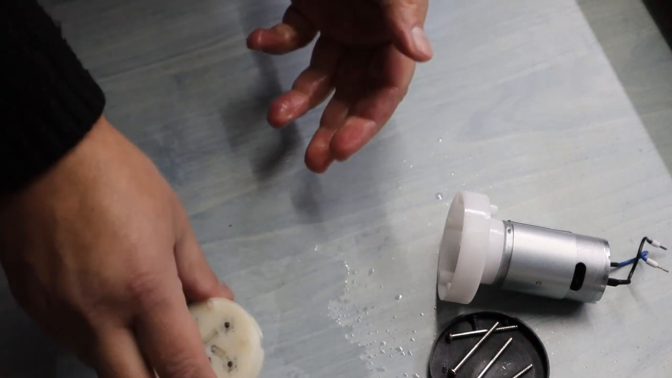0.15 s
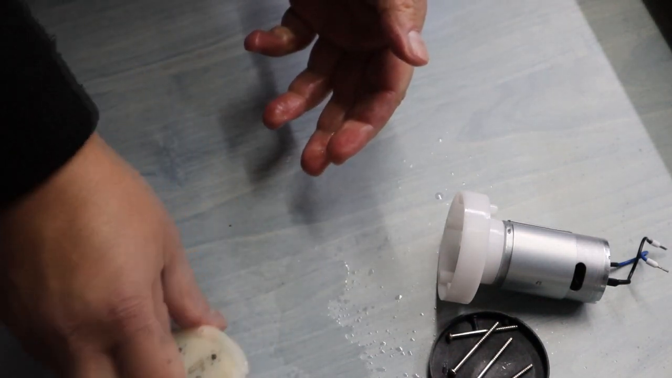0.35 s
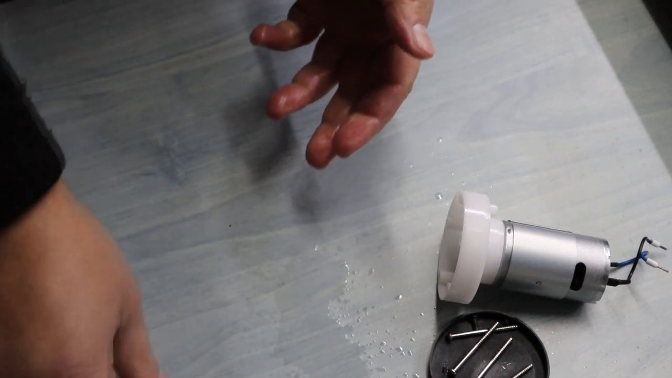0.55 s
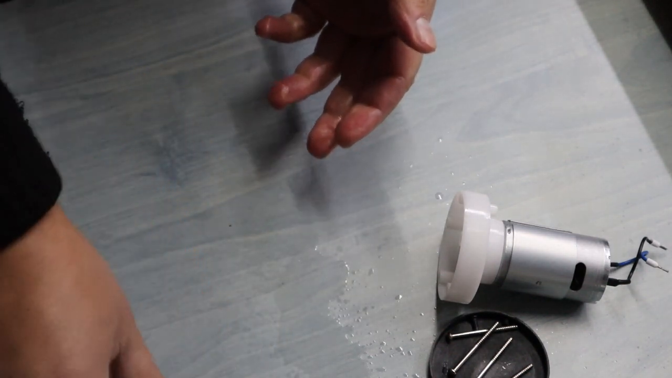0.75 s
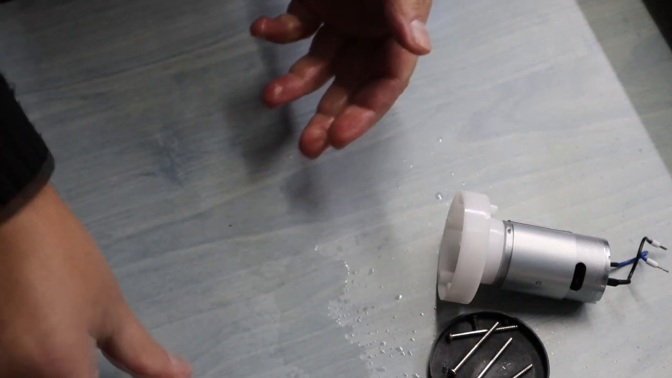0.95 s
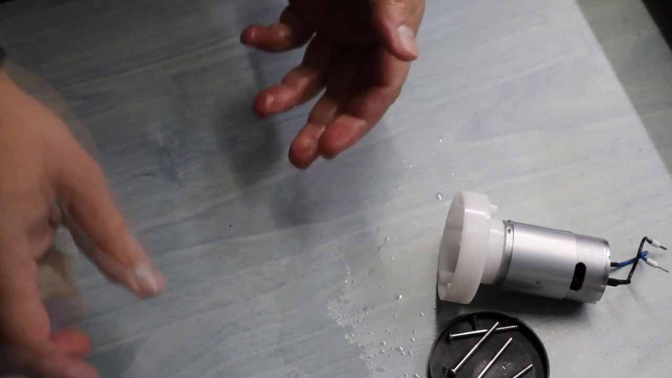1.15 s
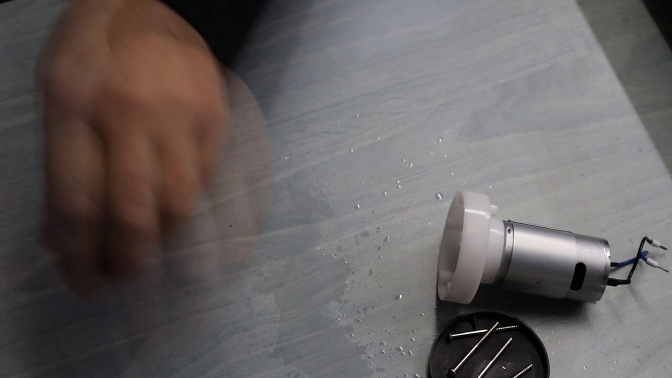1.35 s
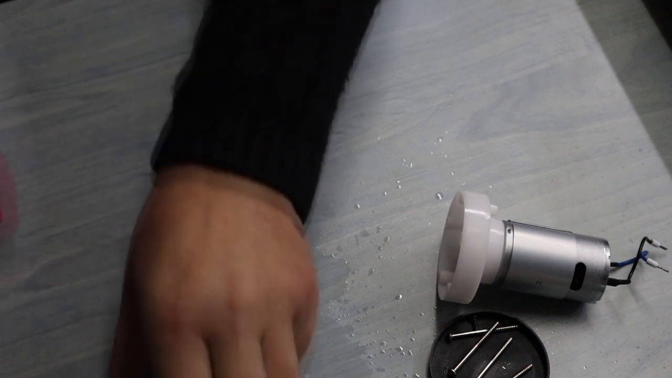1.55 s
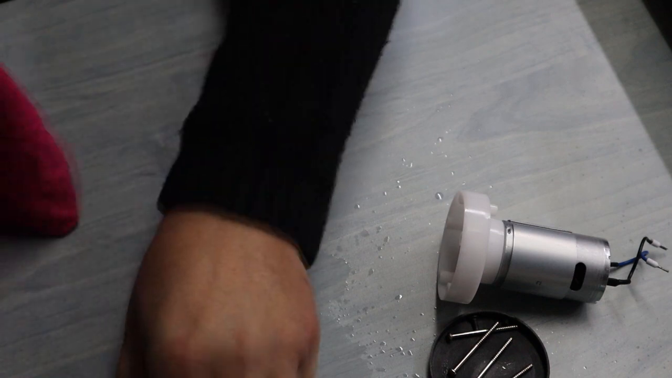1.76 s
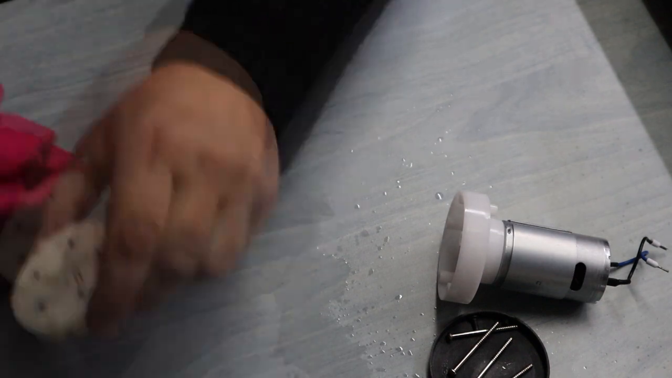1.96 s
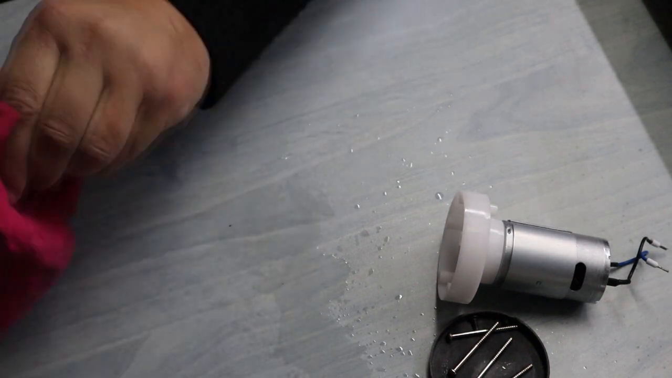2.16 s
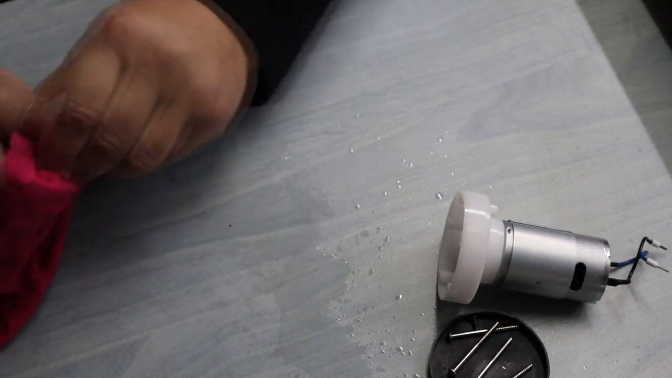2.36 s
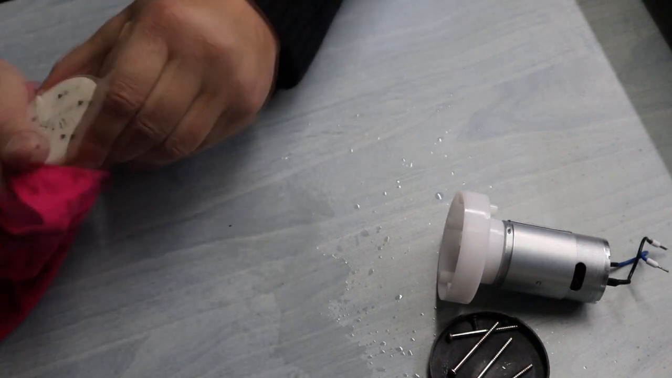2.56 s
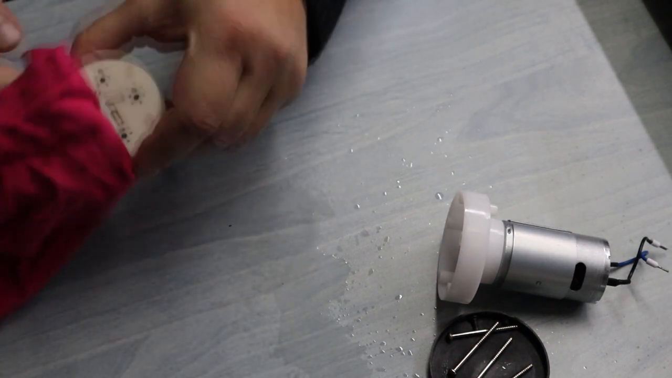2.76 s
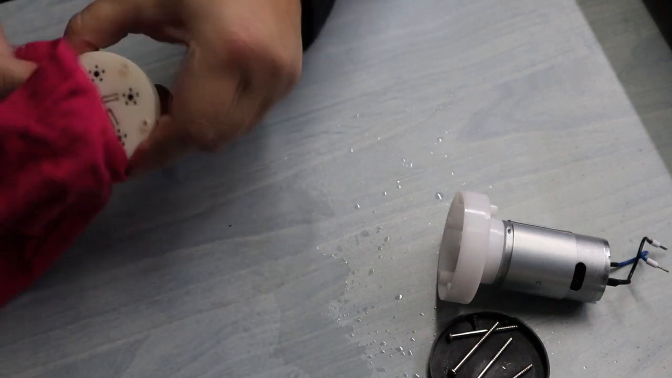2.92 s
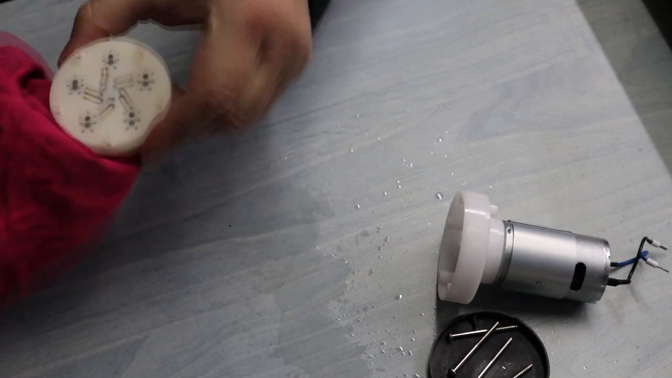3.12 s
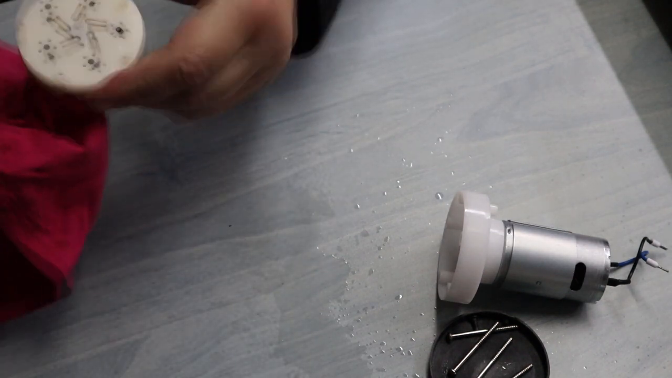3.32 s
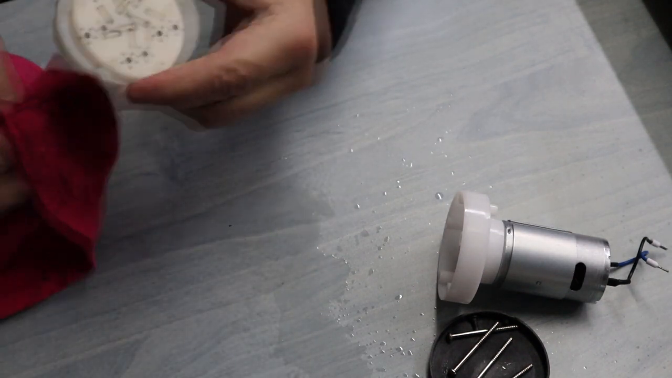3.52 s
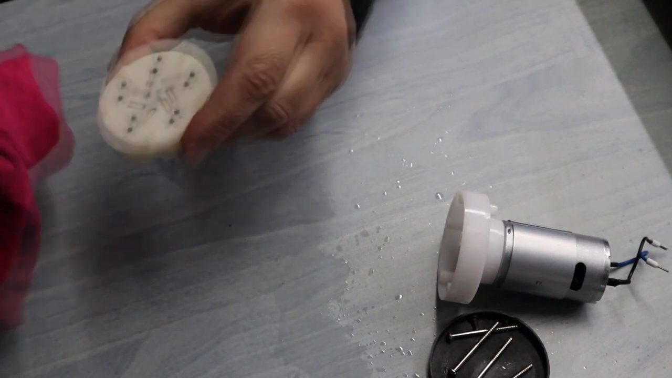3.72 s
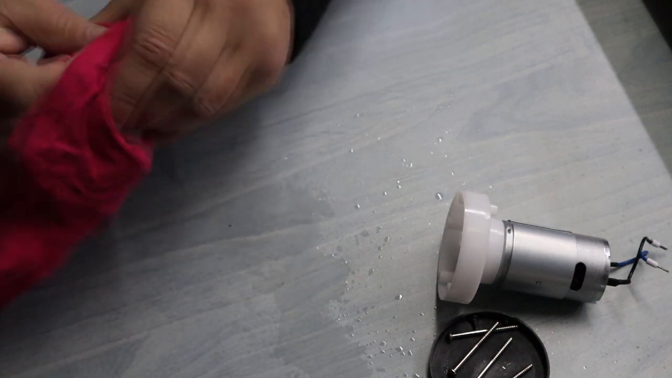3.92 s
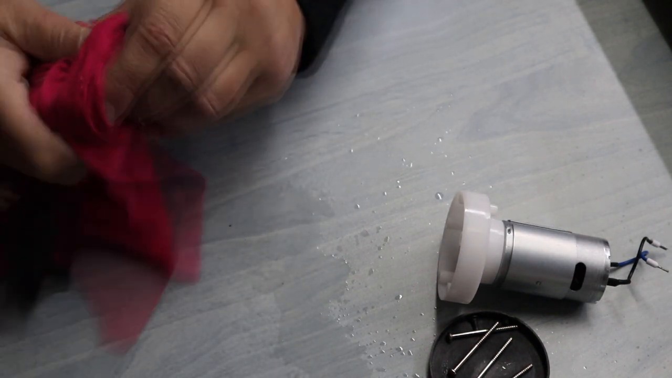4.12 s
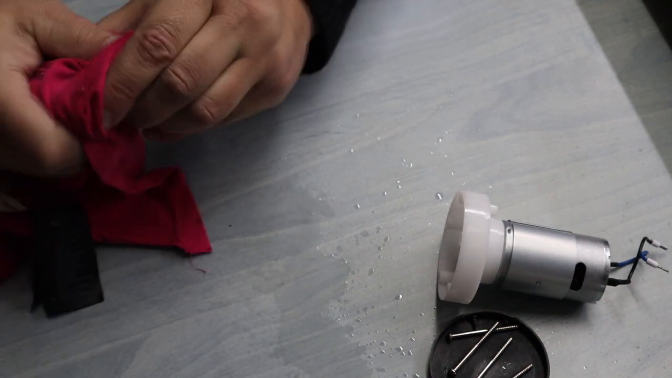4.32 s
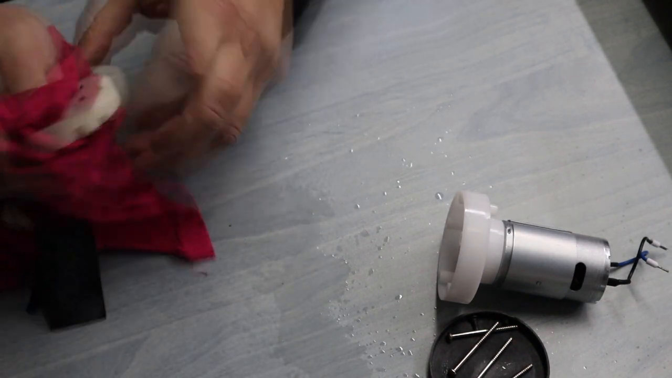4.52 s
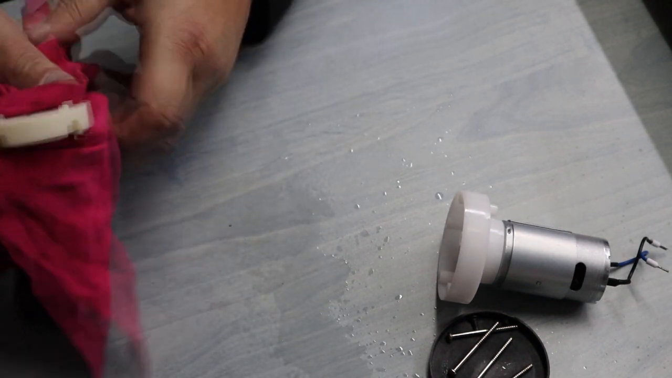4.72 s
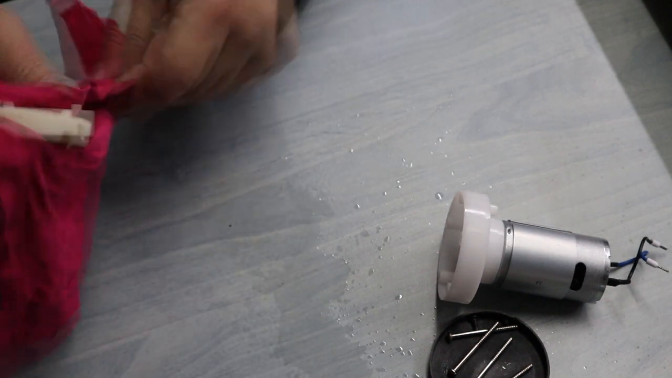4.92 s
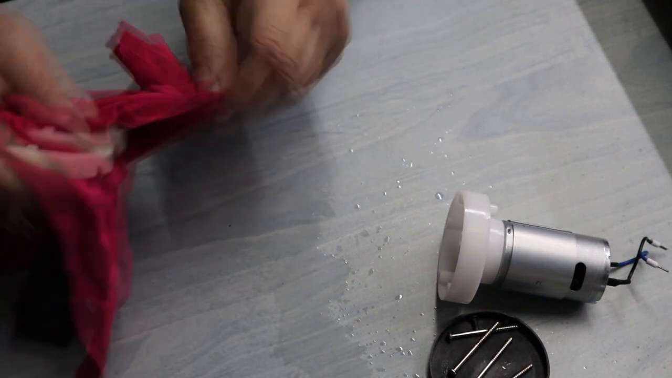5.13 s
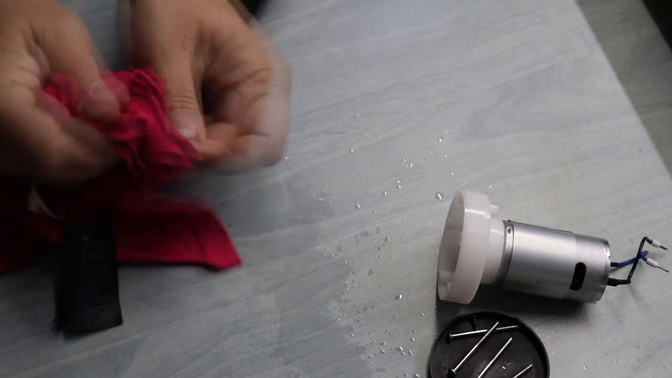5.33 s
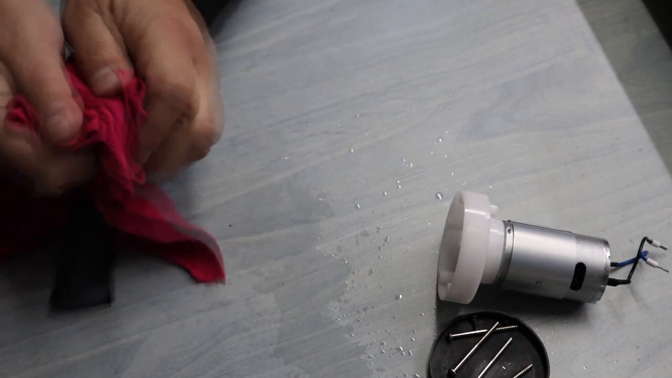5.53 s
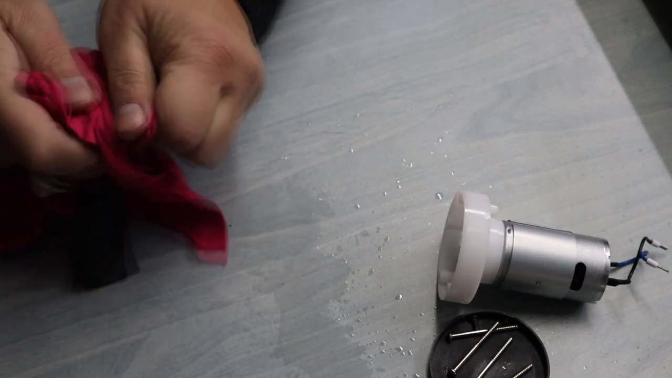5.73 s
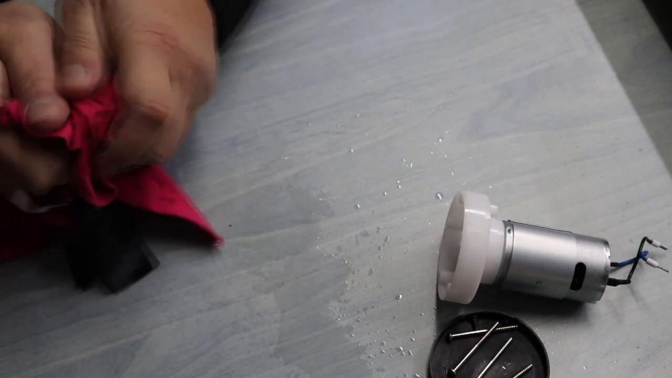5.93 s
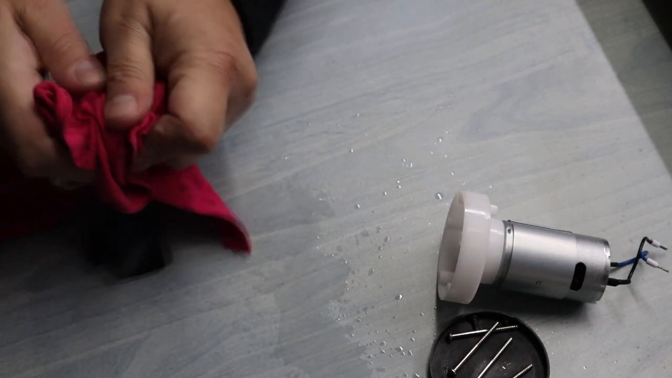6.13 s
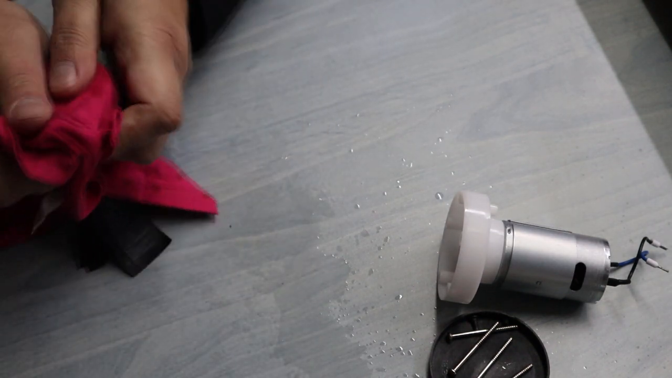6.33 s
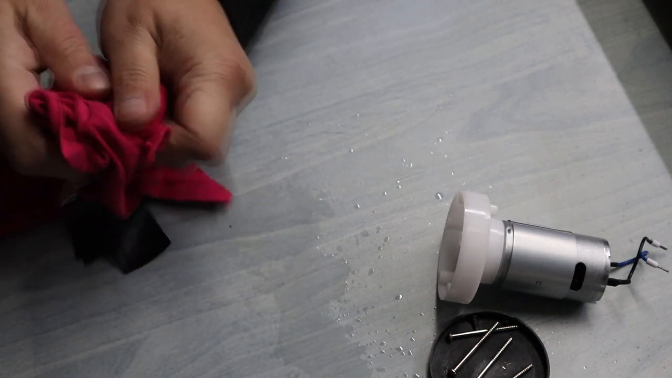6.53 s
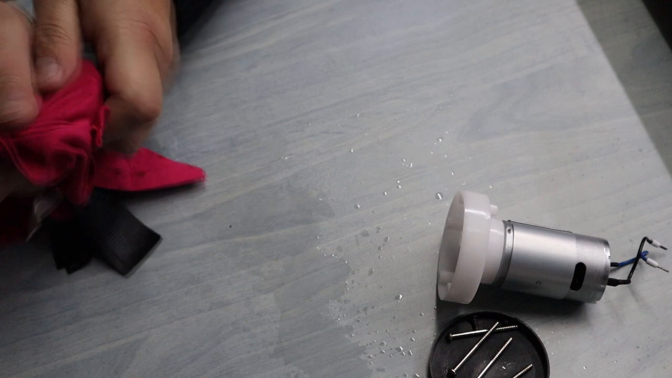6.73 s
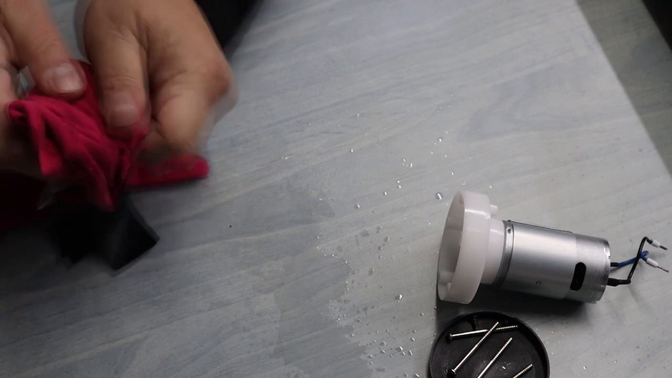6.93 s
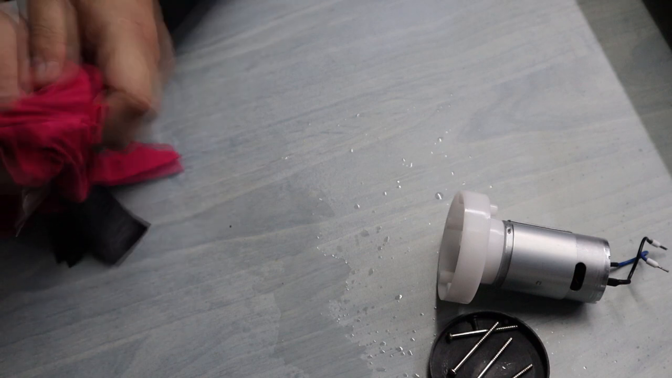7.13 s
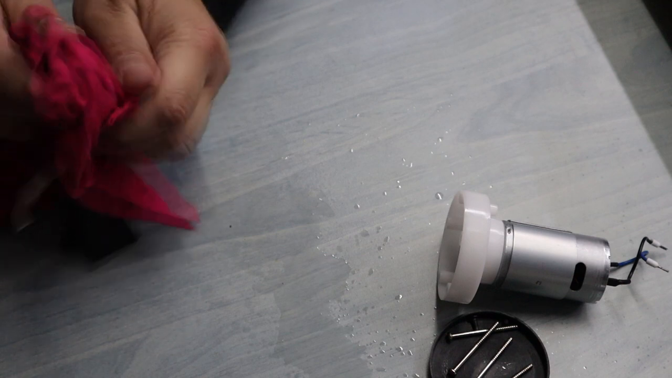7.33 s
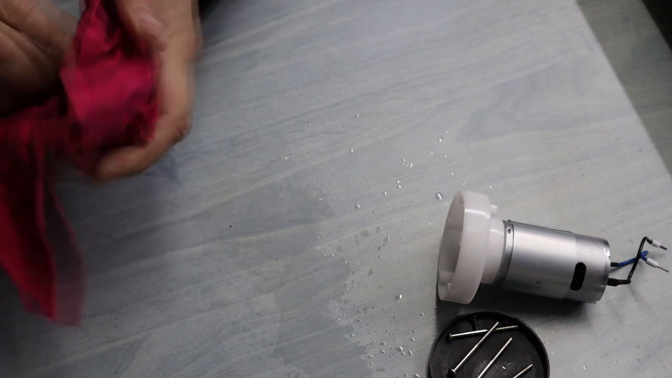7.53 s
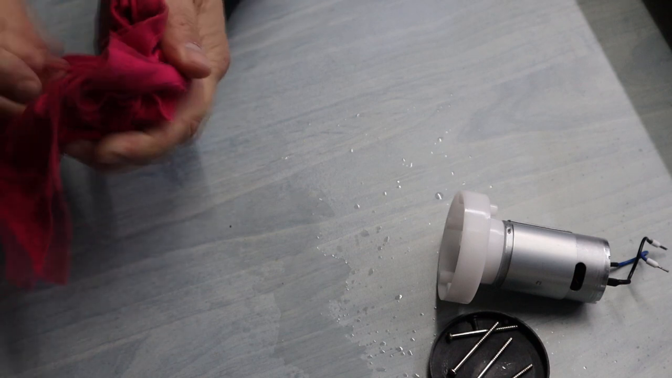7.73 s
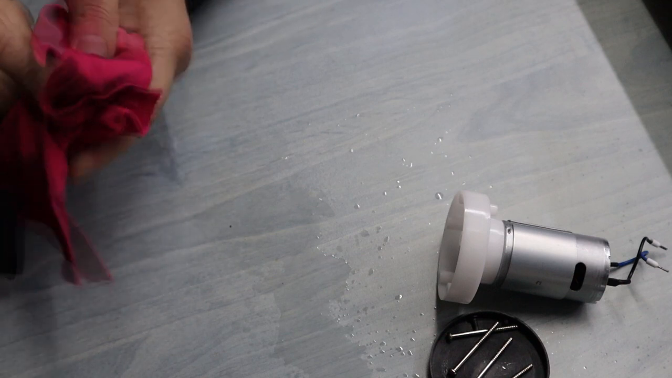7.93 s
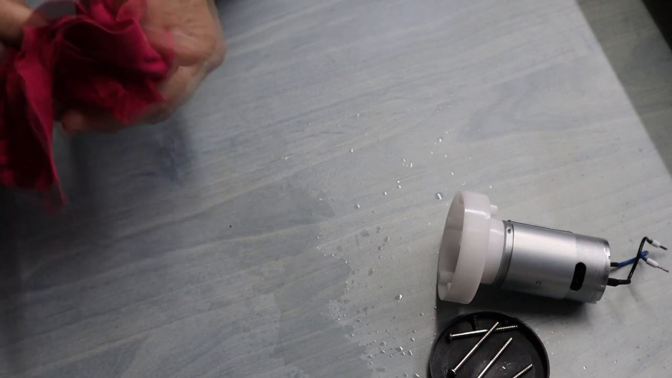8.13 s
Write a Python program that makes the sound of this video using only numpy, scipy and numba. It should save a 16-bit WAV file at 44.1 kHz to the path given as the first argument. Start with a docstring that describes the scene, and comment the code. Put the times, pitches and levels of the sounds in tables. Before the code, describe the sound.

A plastic disc knocks and slides on a tabletop, is scraped up by hand, then rubbed with a cloth in soft uneven strokes and small clicks.

```python
"""Plastic disc on a table, then wiped with a cloth

A plastic pump disc is knocked and slid on a table, scraped up by hand and then wiped dry with a cloth, indoors.
Knocks, hands and taps set off short rings and bursts of noise; sliding, scraping and wiping are dense trains
of tiny random clicks, shaped by filters. The room is soft steady noise with two thin high tones.
Two close microphone ports give a wide image: bass in the centre, treble mostly in the side signal."""
import sys
import numpy as np
from scipy import signal
from scipy.fft import rfft, irfft, next_fast_len
from scipy.io import wavfile
from scipy.ndimage import uniform_filter1d
from numba import njit

SR = 44100
rng = np.random.default_rng(int(sys.argv[2]) if len(sys.argv) > 2 else 0)


def waveform_to_disk(signal):
    """Save audio, clipped to [-1, 1], as 16-bit WAV at the path in sys.argv[1]."""
    frames = np.transpose(np.atleast_2d(signal))
    scaled = np.clip(frames, -1, 1) * 32767
    samples = np.round(scaled).astype(np.int16)
    wavfile.write(sys.argv[1], SR, samples)


N = 364707

# How wide sounds near the hands are. Each row: frequency in Hz, side over mid in dB.
WIDE_HANDS = [(30, -44), (110, -33), (380, -15), (700, -9), (1300, -6), (2400, 2), (8000, 3), (11500, 4),
              (13000, 17.5), (15000, 13)]
# Colour of the fibre hiss. Each row: frequency in Hz, level in dB.
FIBRES = [(2000, -28), (3500, -8.5), (6000, -5), (8500, -5.5), (10300, -3.5), (11500, -8), (12700, -24),
          (15000, -50)]


def table():
    """Each knock strikes every mode (natural ring) of the table top with a strength of its own."""
    # The disc lands twice, each time with two bounces.
    # Each row: start in seconds, strength in dB, rattle level in dB, rattle's time to fall 60 dB in seconds.
    knocks = [(0.109, -16, -27, 0.11), (0.1164, -26.5, -32, .12), (.1335, -29.5, -34.5, 0.091),
              (0.6472, -17.5, -28.5, 0.21), (0.6527, -20.5, -36, 0.38), (0.66, -31, -42, 0.2)]
    # Rings of the table top. Each row: pitch in Hz, level in dB, time to fall 60 dB in seconds.
    top_modes = [(217.4, -12.5, 0.24), (324, -19, 0.075), (392.5, -8, 0.13), (548, -16, 0.12),
                 (665, -9, 0.11), (707, -13.5, 0.16), (792, -13, 0.13), (834, -7, 0.1), (939, -5, 0.047),
                 (1066, -13, 0.071), (1155, -13, 0.11), (1352, -18.5, 0.14), (1960, -21, 0.091),
                 (2250, -20, 0.074), (2330, -26, 0.049), (3100, -22, 0.046), (4580, -24, 0.038),
                 (5200, -32, 0.084)]
    # How wide the table top sounds. Each row: frequency in Hz, side over mid in dB.
    wide_table = [(60, -12), (110, -13), (200, -20), (380, -16), (700, -9.5), (1290, -2), (2380, 1),
                  (4390, 2), (8110, 5), (15000, 2)]
    hits = np.array(knocks)
    hit_samples = np.round(hits[:, 0] * SR).astype(int)
    scatter_db = 1.9 * rng.standard_normal((len(hits), 2 * len(top_modes)))
    out = np.zeros((2, N))
    for k, (hz, level_db, t60) in enumerate(top_modes):
        force = np.zeros((2, N))
        force[:, hit_samples] = amp(hits[:, 1] + scatter_db[:, 2 * k:2 * k + 2].T)
        side = (-1) ** k * amp(at_hz(wide_table, hz))
        out += ringing(force, hz, t60) * amp(level_db) * [[1], [side]]

    # the many weak modes of the top and the first reflections blur into a dying rattle
    t = np.arange(N) / SR
    tail = 0
    for s, _, level_db, t60 in knocks:
        tail = tail + amp(level_db - 60 * np.maximum(t - s, 0) / t60) * (t >= s)
    # each pair: frequency in Hz, level in dB
    rattle = [(150, -27), (220, 0), (400, 5.5), (1000, -1.0), (1750, -18.0), (2300, -12), (2900, -22),
              (3450, -18.5), (4100, -31), (4900, -22.5), (6200, -34.5), (11000, -8.0), (13000, -66)]
    out = out + tail * coloured(rng.standard_normal((2, N)), rattle, wide_table, direct=0.35)
    # no deep bass from a small top, no click from blunt plastic
    return signal.sosfilt(signal.butter(4, [195, 6500], "band", fs=SR, output="sos"), out)


def slide():
    """The sliding disc excites the table's low rings, heard as a shifting rumble and a faint whistle."""
    # One list per slide. Each row: time in seconds, rumble level in dB, rumble pitch in Hz,
    # rumble's second mode in dB, whistle level in dB, whistle pitch in Hz.
    slides = [
        [(.17, -48, 397, -50, -70, 2300), (.22, -45.5, 404, -50, -72, 2350), (.27, -59, 420, -62, -62, 2500),
         (.305, -46, 405, -59, -64, 2640)],
        [(.315, -45, 390, -59, -59, 2650), (.36, -40.5, 323, -59, -60, 2620), (.395, -38, 317, -45, -57, 2670),
         (.412, -49, 403, -43.5, -56, 2640), (.43, -54, 382, -49, -61, 3040), (.47, -73, 380, -81, -65, 3070),
         (.6, -65, 400, -73, -59, 3040)],
        [(.73, -58, 412, -51, -60, 2800), (.78, -52, 390, -57, -65, 2550), (.82, -58, 400, -52, -62, 2350),
         (.87, -46.5, 374, -49.5, -65, 2330), (.915, -49, 378, -50.5, -77, 2230),
         (.935, -71, 380, -67, -75, 2180)],
    ]
    overtone, undertone, undertone_db = 1.42, 0.85, -4   # second modes: pitch ratios, and the whistle's level
    rumble_db, rumble_hz, overtone_db, whistle_db, whistle_hz = in_time(np.concatenate(slides))
    index = np.arange(N)
    moving = np.zeros(N, bool)
    for rows in slides:
        moving |= (index > rows[0][0] * SR - 250) & (index <= rows[-1][0] * SR + 250)
    # level in dB, pitch in Hz, width in Hz, side over mid in dB, clicks per second
    bands = ((rumble_db, rumble_hz, 100, -16, 3000),
             (overtone_db, overtone * rumble_hz, 130, -12, 3000),
             (whistle_db, whistle_hz, 220, 1.5, 5000),
             (whistle_db + undertone_db, undertone * whistle_hz, 220, 1.5, 5000))
    out = 0
    for level_db, hz, width_hz, side_db, per_s in bands:
        cosines = np.cos(2 * np.pi * np.maximum(hz, 100) / SR)
        r = np.exp(-np.pi * width_hz / SR)
        clicks = grains(per_s, spread_db=-3.0)
        band = gliding(gliding(clicks, cosines, r), cosines, r)   # twice, for steep skirts
        level = amp(level_db + 1.8 * drift(28.8))
        out = out + level * band / band[0, moving].std() * amp([[0], [side_db]])
    return out * uniform_filter1d(moving * 1., size=800)   # soft edges


def slaps():
    """Each contact is three rough noise bursts that swell fast and die; the grip sets how thump and clack ring."""
    # Hand, cloth, disc and table meeting softly. Each row: start in seconds, thump in dB, thump pitch in Hz,
    # clack in dB, clack pitch in Hz, second clack pitch in Hz, hiss in dB, basic rise in seconds,
    # thump's time to fall 60 dB in seconds.
    contacts = [(1.007, -35, 332, -59, 970, 600, -72, 0.0012, .13),
                (1.51, -32, 560, -33.5, 3140, 2450, -38, 0.0036, .17),
                (1.668, -32, 377, -33, 1910, 1070, -40.5, 0.0022, 0.13),
                (2.136, -40, 386, -37, 1740, 2800, -50, 0.0012, 0.11),
                (2.247, -35, 473, -41, 2980, 2500, -49, 0.0018, 0.1),
                (4.33, -45.5, 210, -72, 1600, 1200, -76, 0.013, 0.055),
                (5.071, -39.5, 261, -54, 1500, 1000, -52, 0.0011, 0.055),
                (5.969, -38, 283, -38.5, 1810, 2660, -38.5, 0.004, 0.19)]
    # Colours of the thump and clack noises. Each row: frequency in Hz, level in dB.
    thump_spectrum = [(59, -14), (100, -4), (360, -5.5), (806, -7), (920, -9), (1010, -4), (1400, -36),
                      (1820, -23), (3080, -120)]
    clack_spectrum = [(710, -33), (1200, 8), (1380, 9), (1510, 5), (2090, 2), (3160, 0), (5000, 1),
                      (6500, -6), (11000, -120)]
    hold_s = 0.01   # the contact lasts before it dies
    noises = [coloured(grains(7000, spread_db=2.0), spectrum, WIDE_HANDS)
              for spectrum in (thump_spectrum, clack_spectrum, FIBRES)]
    out = np.zeros((2, N))
    for s, thump_db, thump_hz, clack_db, clack_hz, second_hz, hiss_db, rise, t60 in contacts:
        at = round(s * SR)
        span = min(SR // 2, N - at)
        t = np.arange(span) / SR
        bursts = []
        # the low push of the flesh builds more slowly than the hiss of first touch, and lasts longer
        for noise, level_db, lasting, slower in zip(noises, (thump_db, clack_db, hiss_db),
                                                    (1.0, 0.7, 0.55), (1.5, 1.2, 1.05)):
            rise_s = rise * slower
            growth = np.clip(t / max(rise_s, 1e-4), 0, 1)
            dying_s = np.maximum(t - rise_s - hold_s, 0)
            fade = amp(level_db - 60 * dying_s / (max(t60, 0.01) * lasting))
            bursts.append(noise[:, at:at + span] * growth * fade)
        thump, clack, hiss = bursts
        low = 0.6 * thump + 1.2 * tuned(thump, thump_hz, 3.4)
        middle = 0.58 * clack + 2.6 * tuned(clack, clack_hz, 8.3) + 2.0 * tuned(clack, second_hz, 9.5)
        out[:, at:at + span] += low + middle + hiss
    return out


def drag():
    """The rim stutters over the top: clicks into the disc and a table shudder; each scrape favours one pitch."""
    # The disc is dragged off the table in scrapes that catch abruptly and slip away.
    # Each row: peak in seconds, length in seconds, scrape in dB, table shudder in dB, squeal in dB, squeal in Hz.
    scrapes = [(1.831, 0.057, -41, -48, -49, 2040), (1.869, 0.053, -44, -46, -44.5, 1200),
               (1.928, 0.03, -46, -46, -48, 1290), (1.953, 0.075, -39.5, -48, -52, 1610),
               (2.016, 0.05, -45, -46, -44, 1190), (2.078, 0.057, -41, -44, -44, 1910),
               (2.111, 0.055, -34, -40, -40, 1200), (2.137, 0.058, -34.5, -37, -45, 1750),
               (2.178, 0.1, -51, -49.5, -51.5, 1230)]
    # Rings of the disc. Each row: pitch in Hz, width in Hz, level in dB.
    disc_modes = [(606, 80, -4), (1187, 80, 4), (1650, 200, -4), (2770, 50, 6), (3400, 220, -9)]
    # Colour of the table's shudder. Each row: frequency in Hz, level in dB.
    shudder_spectrum = [(90, -7), (130, -6.5), (170, 1.5), (250, 0), (400, 0), (700, -39), (1500, -90)]
    catch = 3.0   # a scrape rises this many times faster than it fades
    scrape_gain, shudder_gain = np.sqrt(swells([row[:4] for row in scrapes], catch))
    clicks = grains(3500, spread_db=0.1)
    # each pair: frequency in Hz, level in dB
    broad_spectrum = [(300, -3.5), (900, 6.5), (2000, 6.5), (3800, -1.5), (6000, -23), (12000, -60), (15000, -90)]
    broad = coloured(clicks, broad_spectrum, WIDE_HANDS)
    scrape = 0.5 * resonant(clicks, disc_modes, WIDE_HANDS, patchy_db=5.5) + 0.64 * broad
    shudder = coloured(rng.standard_normal((2, N)), shudder_spectrum, WIDE_HANDS)
    out = scrape_gain * amp(2.0 * drift(60.05)) * scrape + shudder_gain * shudder
    return out + squeals(broad, [row[:2] + row[4:] for row in scrapes], 18, catch)


def cloth():
    """Fibres slip in very dense grains; pressure adds a lower band and sets the hollow of the disc sounding."""
    # Strokes of the cloth. Each row: middle in seconds, length in seconds, fibre hiss in dB,
    # pressure on the disc face in dB, hollow in dB.
    strokes = [(2.23, 0.027, -55, -60, -66), (2.467, 0.052, -53, -59, -67), (2.688, 0.086, -61.5, -68, -60),
               (2.957, 0.076, -57, -71, -63), (3.58, 0.053, -62.5, -64, -54), (4.023, 0.17, -57, -59, -62),
               (4.153, 0.063, -55, -52, -74), (4.251, 0.067, -53, -50.5, -78),
               (4.391, 0.05, -55.5, -52.0, -62), (4.526, 0.11, -49.5, -48, -55.5),
               (4.678, 0.08, -49, -54.5, -57.5), (4.775, 0.09, -52, -74, -77),
               (4.926, 0.027, -57.5, -65, -74), (5.003, 0.033, -52.5, -58, -58),
               (5.06, 0.056, -54, -64, -70), (5.23, 0.11, -54, -61, -63), (5.324, 0.1, -52.5, -58, -56),
               (5.497, 0.12, -53.5, -57, -54.5), (5.644, 0.082, -56.5, -61, -60),
               (5.743, 0.11, -51.5, -51.5, -56.5), (5.855, 0.08, -51.5, -50.5, -61),
               (6.19, 0.1, -48.5, -48.5, -62), (6.342, 0.11, -49, -52, -58),
               (6.537, 0.11, -50, -53.5, -56.5), (6.737, 0.094, -49, -54.5, -55),
               (6.879, 0.11, -53.5, -53.5, -53.5), (6.971, 0.062, -53.5, -55, -58),
               (7.123, 0.091, -48, -55.5, -54.5), (7.268, 0.078, -50, -55.5, -52.5),
               (7.348, 0.089, -56, -61, -72.0), (7.415, 0.021, -55.5, -70, -72.0),
               (7.519, 0.13, -52, -58.5, -63), (7.657, 0.082, -59, -65, -76), (7.89, 0.14, -59.5, -74, -68),
               (8, 0.08, -56, -58, -71.5), (8.103, 0.033, -55, -52.5, -57), (8.26, 0.22, -57.5, -56, -60)]
    # Sleeves and loose cloth under the strokes. Each row: time in seconds, fibre hiss in dB,
    # lower rustle in dB, hollow in dB.
    loose_cloth = [(0.0, -72, -74, -87), (0.26, -66, -60.5, -56), (0.52, -68, -57.5, -58.5),
                   (0.92, -67, -69, -60.5), (1.25, -68.5, -58.5, -67), (1.27, -57.5, -59, -55.5),
                   (1.5, -52.5, -51, -57), (1.62, -51.5, -55, -53.5), (1.77, -59, -51.5, -53.5),
                   (2.06, -56, -51, -51), (2.36, -59.5, -59, -60), (3.06, -62.5, -62, -63),
                   (3.3, -61.5, -62.5, -63), (3.8, -65, -65.5, -71), (5.5, -59.5, -59, -65),
                   (7.4, -59.5, -61, -65), (7.75, -66, -66.5, -72), (8.27, -66, -65, -67)]
    # Colour of the rubbed disc face. Each row: frequency in Hz, level in dB.
    face_spectrum = [(760, -2), (1300, -2.5), (1620, -4), (1910, 3), (2500, 1.5), (2800, 2.5), (3600, 2.5),
                     (4740, -2), (6000, -12.5), (7800, -15), (13200, -120)]
    # Air inside disc and fist. Each row: pitch in Hz, width in Hz, level in dB.
    hollow_modes = [(583, 94, -1.5), (799, 92, -1), (922, 110, -4), (1446, 280, -8.5)]
    # Wet cloth squeaking on the disc. Each row: middle in seconds, length in seconds, level in dB, pitch in Hz.
    squeak_rows = [(4.535, .04, -57, 685), (6.49, 0.032, -49.5, 785), (6.737, .025, -51, 1410),
                   (6.752, 0.062, -49.5, 803), (6.867, .04, -54, 586), (6.85, 0.045, -52, 817),
                   (7.128, 0.024, -48.5, 797), (7.15, .04, -52, 960), (7.273, .05, -54, 817)]
    hollow_lag_s, hollow_share = 0.0048, 0.96   # the hollow sounds late in a stroke, for part of its length
    face_ring_hz, face_ring_db = 2870, -6   # the wiped face rings a little under the strokes
    pan_db = 1.94   # left over right

    loose_power = amp(in_time(loose_cloth)) ** 2
    hiss_power, face_power = swells([row[:4] for row in strokes])
    hollow_power, = swells([(s + hollow_lag_s, length * hollow_share, hollow_db)
                            for s, length, _, _, hollow_db in strokes])
    wobble = amp(1.0 * drift(70) + 0.5 * drift(16))

    fibres = coloured(grains(15000, spread_db=1.5), FIBRES, WIDE_HANDS, direct=0.65)
    hiss = np.sqrt(loose_power[0] + hiss_power) * wobble * fibres

    rub = coloured(grains(5000, spread_db=-0.5), face_spectrum, WIDE_HANDS, direct=0.87)
    rub = wobble * amp(1.1 * drift(45)) * rub
    face_ring = amp(face_ring_db + 2.5 * drift(12)) * tuned(rub, face_ring_hz, 15.0)
    face = np.sqrt(loose_power[1] + face_power) * rub + np.sqrt(face_power) * face_ring

    slips = grains(2500, spread_db=1.8)
    hollow = resonant(slips, hollow_modes, WIDE_HANDS, patchy_db=2.0)
    hollow = np.sqrt(loose_power[2] + hollow_power) * amp(0.6 * drift(40)) * hollow

    friction = coloured(slips, [(300, -14), (700, 7), (1500, -4), (3000, -30)], WIDE_HANDS)
    squeaks = squeals(friction, squeak_rows, 27)
    return left_right(hiss + face + hollow + squeaks) * amp([[pan_db / 2], [-pan_db / 2]])


def taps():
    """Each click is a short low ring of the held disc and a snap, both building over their first half cycle."""
    # A fingertip or seam taps the disc. Each row: start in seconds, ring strength in dB, ring pitch in Hz,
    # snap strength in dB, snap pitch in Hz.
    tap_rows = [(3.571, -37, 440, -33, 1330), (4.526, -29, 755, -31, 3200), (4.546, -34, 750, -35, 3200),
                (5.072, -33, 1310, -28.5, 9800), (5.508, -32, 930, -39, 3500), (5.979, -20, 645, -18, 1870),
                (6.493, -33, 795, -50, 3000), (6.907, -28, 880, -32, 3200), (7.411, -56, 800, -32, 7400),
                (7.529, -34.5, 755, -36, 2100)]
    ring_cycles, snap_t60_s = 9.2, 0.004   # until 60 dB down
    out, t = np.zeros((2, N)), np.arange(SR // 10) / SR
    signs = rng.choice([-1, 1], (len(tap_rows), 2))
    for (s, ring_db, ring_hz, snap_db, snap_hz), (ring_sign, snap_sign) in zip(tap_rows, signs):
        at = round(s * SR)
        for level_db, hz, t60, sign in ((ring_db, ring_hz, ring_cycles / ring_hz, ring_sign),
                                        (snap_db, snap_hz, snap_t60_s, snap_sign)):
            mid = np.sin(2 * np.pi * hz * t)
            side = np.cos(2 * np.pi * hz * t) * amp(at_hz(WIDE_HANDS, hz))
            envelope = np.minimum(t * hz * 2, 1) * amp(level_db - 60 * t / t60)
            out[:, at:at + len(t)] += sign * np.array([mid, side]) * envelope
    return out


def legs():
    """Soft pushes jolt the table on its legs and set its deep modes swaying, in the middle of the image."""
    # Each row: time in seconds, push in dB.
    jolts = [(1.871, -55), (1.96, -44), (2.094, -37.5), (2.14, -33), (2.23, -45)]
    # Deep modes of the table. Each row: pitch in Hz, level in dB, time to fall 60 dB in seconds.
    leg_modes = [(45.3, 0, 0.33), (64.5, 2, 0.19), (168, 1.5, 0.21), (223, -3.5, 0.23)]
    s, level_db = np.transpose(jolts)
    signs = rng.choice([-1, 1], (len(s), len(leg_modes)))
    out = np.zeros((2, N))
    for k, (hz, mode_db, t60) in enumerate(leg_modes):
        force = np.zeros(N)
        force[np.round(s * SR).astype(int)] = amp(level_db + mode_db) * signs[:, k]
        out[0] += ringing(force, hz, t60)
    return signal.sosfilt(signal.butter(2, [33, 240], "band", fs=SR, output="sos"), out)


def room():
    """Steady air and electronics noise with two thin high tones."""
    # Colour of the noise. Each row: frequency in Hz, level in dB.
    room_spectrum = [(12, -4), (20, -0.5), (76, -1), (147, -4), (242, 0), (350, -5), (700, -8), (1000, -10),
                     (2000, -13), (4000, -22), (6500, -30), (10200, -37), (11800, -33), (13000, -39),
                     (15000, -67)]
    # Width of sound from all around. Each row: frequency in Hz, side over mid in dB.
    wide_diffuse = [(20, -16), (60, -25), (110, -2.5), (200, -3), (400, 4), (1300, 4.5), (4400, 6),
                    (11000, 12), (13000, 14), (15000, 14)]
    # The pitches of the two tones in Hz.
    whine_hz = (12349.5, 11700)
    # Their levels. Each row: mid in dB, side in dB.
    whine_levels = [(-77.5, -68.5), (-95, -82)]
    noise_db = -53
    out = amp(noise_db) * coloured(rng.standard_normal((2, N)), room_spectrum, wide_diffuse, direct=0.39)
    t = np.arange(N) / SR
    for hz, (mid_db, side_db) in zip(whine_hz, whine_levels):
        tone = np.sqrt(2) * np.sin(2 * np.pi * hz * t)   # rms 1
        out = out + tone * amp([[mid_db], [side_db]]) * [[-1], [1]]
    return out


def squeals(source, rows, sharpness, steeper=1):
    """Each row picks one pitch out of the friction and swells on it."""
    out = np.zeros((2, N))
    for middle, length, level_db, hz in rows:
        near = slice(int((middle - 4 * length) * SR), int((middle + 4 * length) * SR))
        squeal = tuned(source[:, near], hz, sharpness)
        gain = np.sqrt(swells([(middle, length, level_db)], steeper)[:, near])
        out[:, near] += gain * squeal / squeal[0].std()
    return out


def swells(rows, steeper=1):
    """Power of each level column: every row swells to its middle, `steeper` times faster than it fades."""
    squareness = 3.1   # 2 is a bell, more is flatter on top
    out = np.zeros((len(rows[0]) - 2, N))
    for middle, length, *levels_db in rows:
        first = max(int((middle - 2 * length) * SR), 0)
        last = min(int((middle + 2 * length) * SR), N)
        near = np.arange(first, last)
        off = 2 * (near / SR - middle) / length
        off = np.where(off < 0, steeper * off, off)
        out[:, near] += np.outer(amp(levels_db) ** 2, np.exp(-abs(off) ** squareness))
    return out


def grains(per_s, spread_db):
    """Mid and side trains of random clicks: the same moments, sizes of their own."""
    sizes = amp(spread_db * np.minimum(rng.exponential(1, N), 4))
    happens = rng.random(N) < per_s / SR
    return sizes * happens * rng.standard_normal((2, N))


def coloured(source, spectrum, wide, direct=0.35):
    """Shaped mid (rms 1) and side; direct sound reaches the left port first, so its side runs ahead of the mid."""
    size = next_fast_len(N)
    hz = np.maximum(np.fft.rfftfreq(size, 1 / SR), 1)
    mid, own = rfft(source, size)
    share = np.clip(direct, 0, 1)
    side = 1j * share * mid + np.sqrt(1 - share ** 2) * own   # 1j: a quarter cycle ahead
    gains = amp(at_hz(spectrum, hz) + np.outer([0, 1], at_hz(wide, hz)))
    out = irfft(np.array([mid, side]) * gains, size)[:, :N]
    return out / out[0].std()


def resonant(source, peaks, wide, patchy_db):
    """Mid and side through parallel resonances that come and go as the grip shifts; the mid has rms 1."""
    out = 0
    for k, (hz, width, level_db) in enumerate(peaks):
        r = np.exp(-np.pi * width / SR)
        b = [(1 - r * r) / 2, 0, (r * r - 1) / 2]
        a = [1, -2 * r * np.cos(2 * np.pi * hz / SR), r * r]
        rung = signal.lfilter(b, a, source + 1e-18)
        level = amp(patchy_db * drift(15)) * amp([[level_db], [level_db + at_hz(wide, hz)]])
        out = out + (-1) ** k * rung * level
    # soften what lies above the top mode
    out = signal.sosfilt(signal.butter(2, 1.4 * peaks[-1][0], fs=SR, output="sos"), out)
    return out / out[0].std()


def ringing(force, hz, t60):
    """A struck mode: a sine at hz that falls 60 dB in t60 seconds after each push."""
    r, w = amp(-60 / (t60 * SR)), 2 * np.pi * hz / SR
    return signal.lfilter([0, np.sin(w)], [1, -2 * r * np.cos(w), r * r], force + 1e-18)


def tuned(x, hz, sharpness):
    """A band around hz with gain 1 on top."""
    b, a = signal.iirpeak(hz, sharpness, fs=SR)
    return signal.lfilter(b, a, x)


@njit
def gliding(source, cosines, r):
    """A resonance whose centre moves from sample to sample."""
    out = np.zeros_like(source)
    for c in range(2):
        for i in range(2, source.shape[1]):
            push = source[c, i] - source[c, i - 2]
            out[c, i] = push + 2 * r * cosines[i] * out[c, i - 1] - r * r * out[c, i - 2]
    return out


def drift(rate):
    """Slow random wandering with a spread near 1, through `rate` (at most 190) chance points a second."""
    knots = rng.standard_normal(int(N / SR * 200) + 2)
    return np.interp(np.arange(N) / SR * min(rate, 190), np.arange(len(knots)), knots)


def in_time(rows):
    """Columns of a curve at every sample; -120 outside its span, which is silence for a level."""
    s, *columns = np.transpose(rows)
    return [np.interp(np.arange(N) / SR, s, column, left=-120, right=-120) for column in columns]


def at_hz(points, hz):
    """Value of a spectrum on a log-frequency axis."""
    points = np.array(points)
    return np.interp(np.log(hz), np.log(points[:, 0]), points[:, 1])


def amp(db):
    """Gain of a level in dB."""
    return 10 ** (np.asarray(db) / 20)


def left_right(pair):
    """Left is mid plus side, right is mid minus side."""
    mid, side = pair
    return np.array([mid + side, mid - side])


def scene():
    """All sources at the two ports."""
    mid_side = table() + slide() + slaps() + drag() + taps() + legs() + room()
    return left_right(mid_side) + cloth()


def record(dry):
    """A steep filter cuts the top: 70 dB down from 15600 Hz upwards."""
    return signal.sosfilt(signal.cheby2(12, 70, 15600, fs=SR, output="sos"), dry)


dry = scene()
out = record(dry)
waveform_to_disk(out)
```